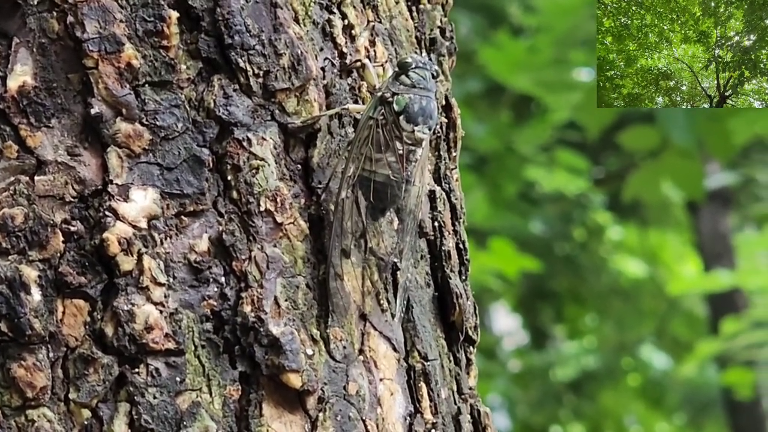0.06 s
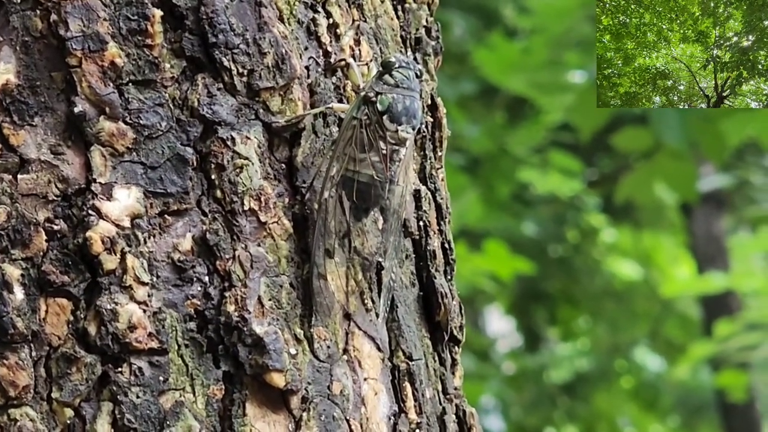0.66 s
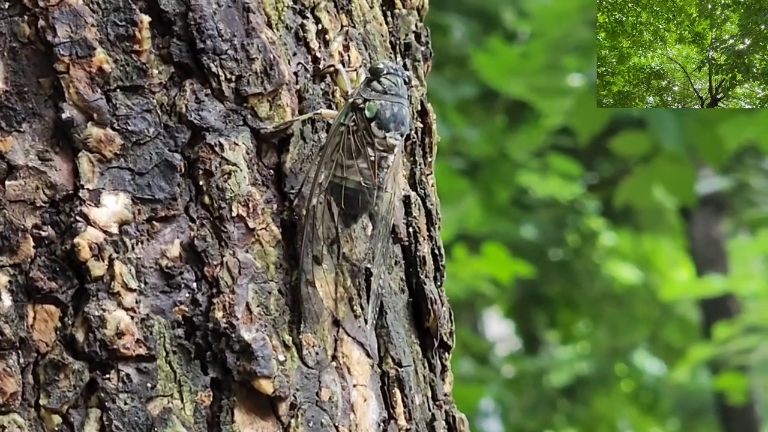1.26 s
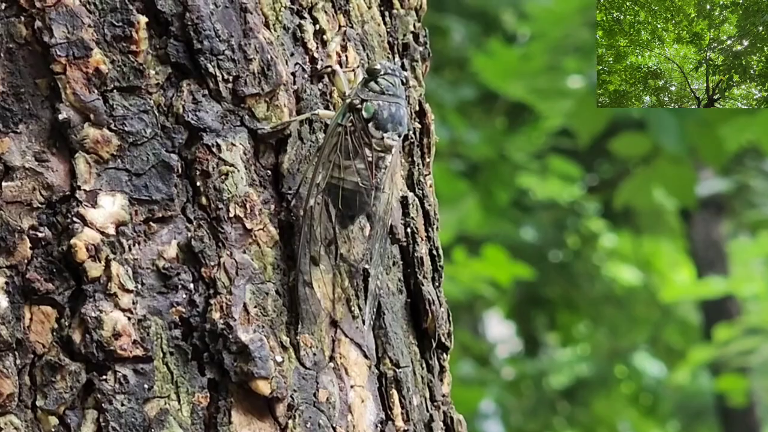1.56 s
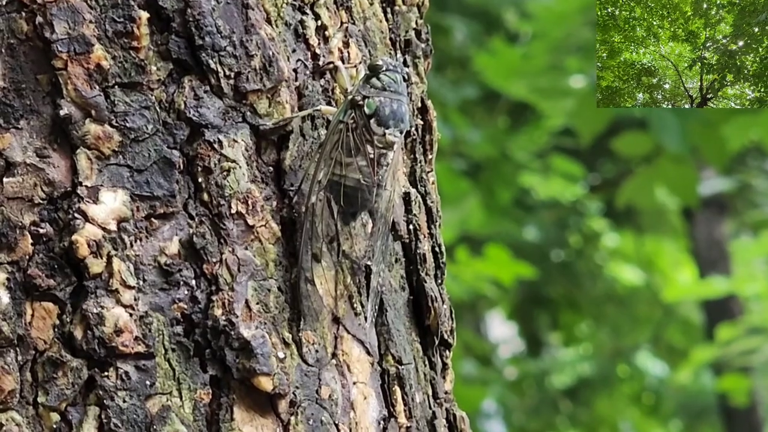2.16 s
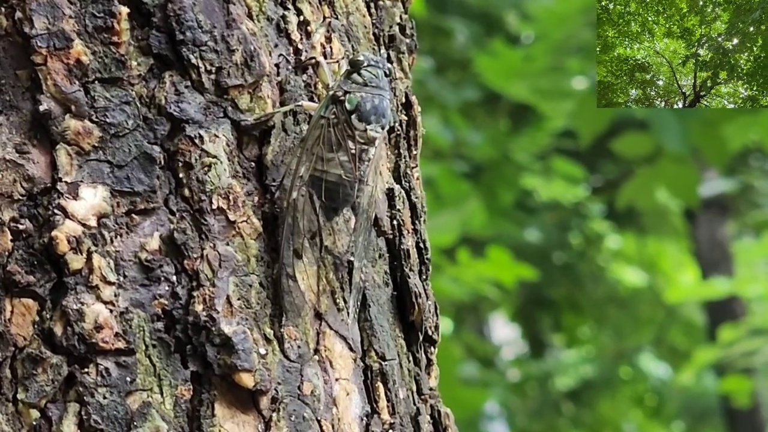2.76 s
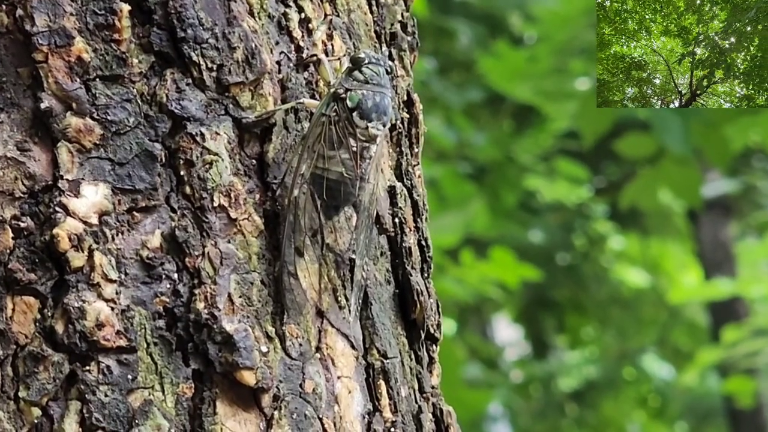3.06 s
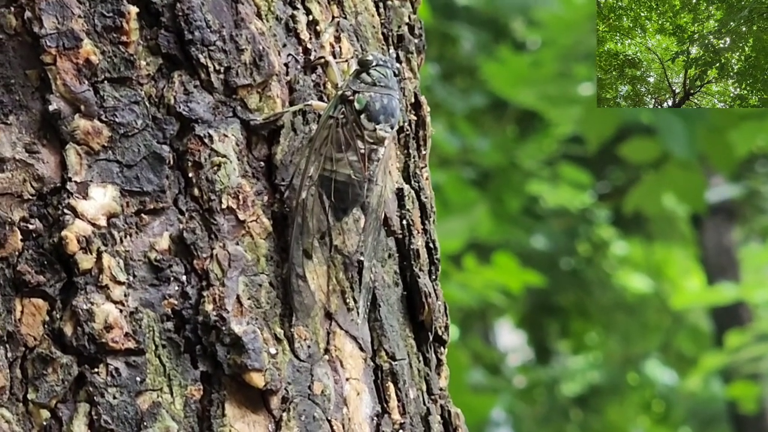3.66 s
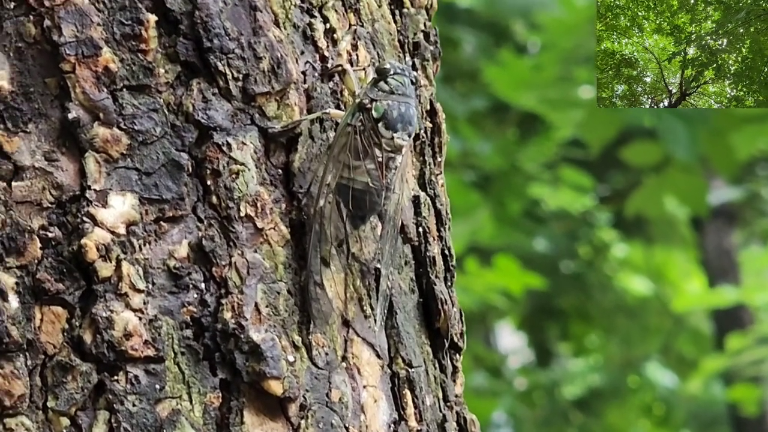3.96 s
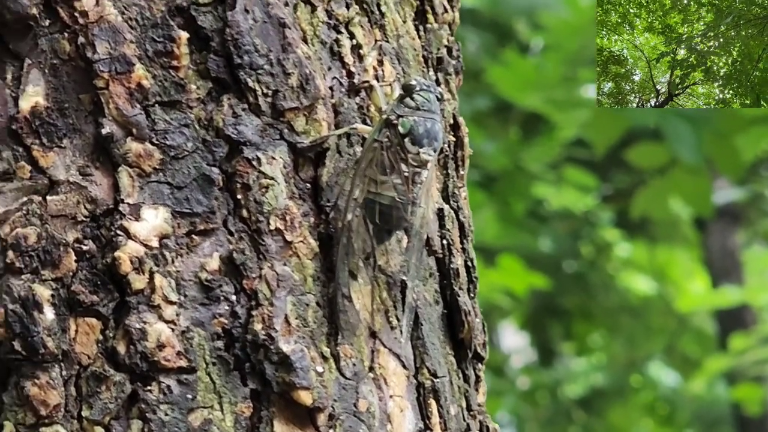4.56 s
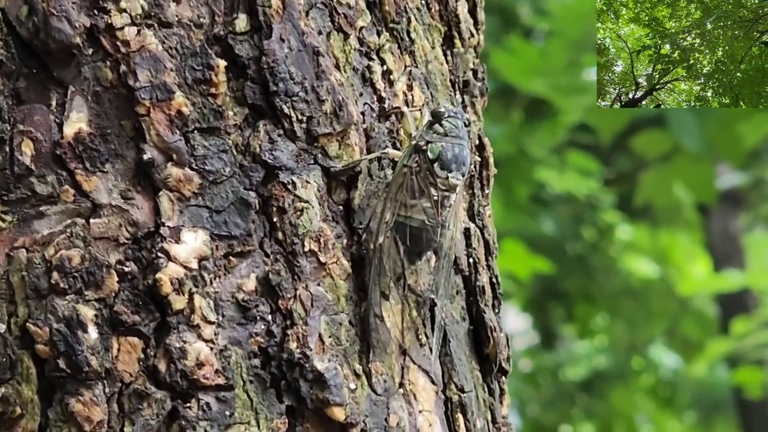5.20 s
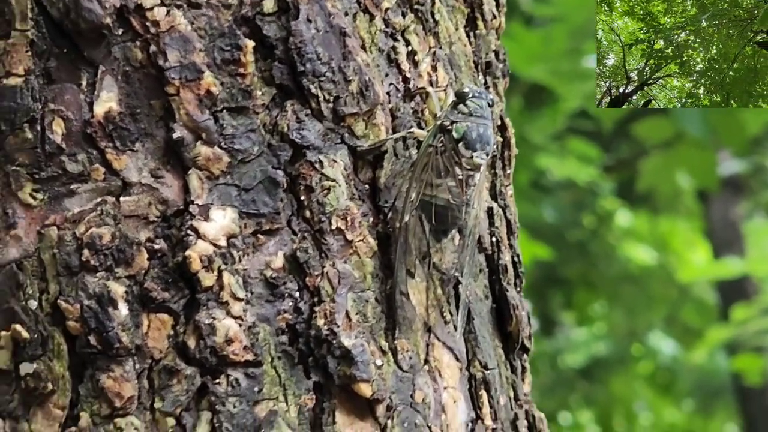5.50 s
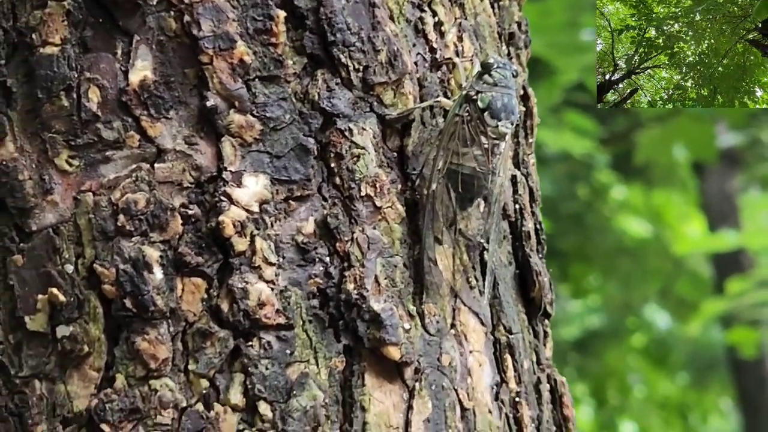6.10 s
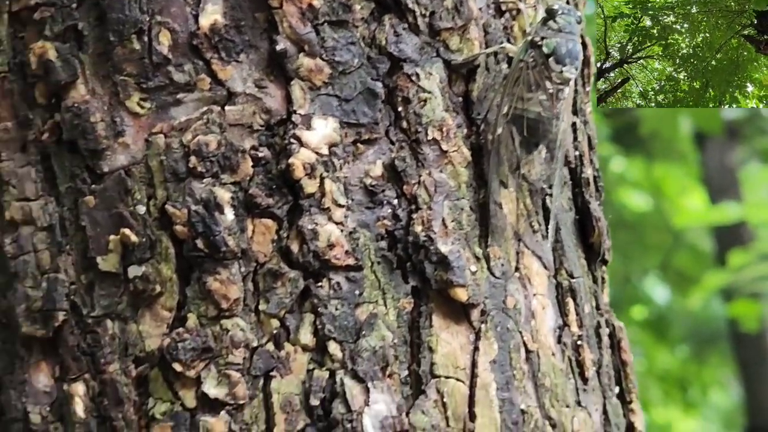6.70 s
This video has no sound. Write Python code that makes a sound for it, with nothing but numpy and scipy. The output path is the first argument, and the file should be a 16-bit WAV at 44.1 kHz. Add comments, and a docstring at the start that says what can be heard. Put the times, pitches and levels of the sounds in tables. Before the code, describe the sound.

A high-pitched cicada chorus fills a forest while a few close insects buzz in bursts over a faint, distant rumble.

```python
"""Cicadas in a summer wood.

A stereo microphone stands under the trees; a few near males stand out from a far drone and hiss.
Each buckles his two tymbals in turn, and the abdomen colours the clicks: now a full buzz, now a
thin shrill. A faint low rumble and hum, as of a distant town, lies beneath."""
import sys
import numpy as np
from scipy import signal
from scipy.fft import rfft, irfft, next_fast_len
from scipy.io import wavfile

SR = 44100
rng = np.random.default_rng(int(sys.argv[2]) if len(sys.argv) > 2 else 0)


def bounce(signal):
    """Save signal as a 16-bit WAV file at the path given by the first command-line argument."""
    frames = np.transpose(np.atleast_2d(signal))
    limited = np.clip(frames, -1, 1)
    pcm = np.round(limited * 32767).astype(np.int16)
    wavfile.write(sys.argv[1], SR, pcm)


N = 301644

# body resonances of a full buzz and a thin shrill: f/Hz, width/Hz, relative level/dB, left-right/dB
FULL_BUZZ = [(4150, 770, 3.5, 14), (4850, 600, 5, -1), (5020, 960, 1.5, 18), (6500, 150, 0, 23),
             (7154, 850, 0, 6)]
THIN_SHRILL = [(12180, 1620, -12.5, 2), (14150, 2000, -4.5, 7.5), (15270, 870, 3, 14)]
BUZZ_ATTACK_S, BUZZ_RELEASE_S = 0.06, 0.09
SHRILL_ATTACK_S, SHRILL_RELEASE_S = 0.25, 0.32


def from_db(db):
    """Decibels to gain."""
    return 10 ** (np.asarray(db) / 20)


def rms_one(x):
    """Scale to unit rms."""
    return x / np.sqrt(np.mean(x ** 2) + 1e-20)


def pan(db):
    """Left and right gains for a level difference, power kept."""
    gains = from_db(np.array([[1], [-1]]) * db / 2)
    return gains / np.sqrt(np.mean(gains ** 2, axis=0))


def in_time(points):
    """Read a curve over time, sample by sample."""
    times, values = np.transpose(points)
    return np.interp(np.arange(N) / SR, times, values)


def at_hz(points, hz):
    """Read a spectrum on a log-frequency axis."""
    f, value = np.transpose(points)
    return np.interp(np.log(hz + 1e-6), np.log(f), value)


def drift(rate_hz):
    """Random wander of unit rms, mostly slower than rate_hz."""
    step, settle = 40, 2000
    r = np.exp(-2 * np.pi * rate_hz * step / SR)
    noise = rng.standard_normal(N // step + settle + 2)
    slow = signal.lfilter([1], [1, -2 * r, r * r], noise)[settle:]
    return np.interp(np.arange(N) / step, np.arange(len(slow)), rms_one(slow))


def resonate(x, hz, width):
    """One resonance with gain 1 at its peak."""
    r = np.exp(-np.pi * width / SR)
    feedback = [1, -2 * r * np.cos(2 * np.pi * hz / SR), r * r]
    return signal.lfilter(np.array([1, 0, -1]) * (1 - r * r) / 2, feedback, x)


def diffuse(spectrum, flicker_db, flicker_hz):
    """Wavering noise that reaches the microphone from all round, alike on both sides only in the bass."""
    # likeness of the two sides: f/Hz, correlation
    likeness = [(30, 0.89), (100, 1), (180, 0.92), (350, 0.74), (700, 0.41), (1300, -0.33), (2500, -0.022),
                (16000, -0.13)]
    # the left side hears more bass and more of the treetops: f/Hz, left-right/dB
    lean = [(60, 0.5), (300, 3), (1300, 1.5), (3000, 1.5), (4600, -0.5), (6500, 0), (9500, -1.5),
            (12000, -2), (14500, 4.5)]
    size = next_fast_len(N)
    hz = np.fft.rfftfreq(size, 1 / SR)
    mid, side = rfft(rng.standard_normal((2, size)))
    alike = np.clip(at_hz(likeness, hz), -1, 1)
    stereo = np.sqrt(1 + alike) * mid + np.sqrt(1 - alike) * side * [[1], [-1]]
    in_band = (hz > spectrum[0][0]) & (hz < spectrum[-1][0])
    gain = from_db(at_hz(spectrum, hz)) * in_band * pan(at_hz(lean, hz))
    noise = irfft(gain * stereo, size)[:, :N]
    return rms_one(noise * from_db(flicker_db * drift(flicker_hz)))


def town():
    """Far beyond the wood traffic rumbles and machinery hums, each tone part steady, part wavering."""
    # traffic spectrum: f/Hz, relative level/dB
    rumble_spectrum = [(13, -40), (22, -22), (38, -3), (59, -5), (76, -4), (107, -7.5), (141, -9.5),
                       (383, -20.5), (459, -19.5), (1290, -25.5), (1700, -28), (2210, -61), (3740, -120)]
    # course of the rumble, which the hum follows: t/s, level/dB
    rumble_level = [(0, -37.5), (2.4, -36.5), (4.5, -38), (6.84, -37.5)]
    # machinery tones: f/Hz, width/Hz, level against the rumble/dB, steady share of the power
    tones = [(53, 3, -1.5, 0.35), (62.1, 3.3, -8.5, 0.36), (100.1, 2.8, -8, 0.88), (120.9, 1.6, -14, 0.08),
             (239, 4, -26, 0.34)]
    t, hum = np.arange(N) / SR, 0
    for hz, width, db, share in tones:
        phase = 2 * np.pi * hz * t
        steady = np.sqrt(2 * share) * np.cos(phase)
        wavering = drift(width) * np.cos(phase) + drift(width) * np.sin(phase)
        hum += from_db(db) * (steady + np.sqrt(1 - share) * wavering)
    rumble = diffuse(rumble_spectrum, flicker_db=0.5, flicker_hz=6.4)
    return from_db(in_time(rumble_level)) * (hum * pan(1.8) + rumble)


def far_chorus():
    """Hundreds of far males merge into a slowly sinking drone, with a shrill hiss from the crowns."""
    # three bands of the chorus: f/Hz, relative level/dB
    low_band = [(1500, -36.5), (2000, -17), (2500, -14.5), (2950, -4.5), (3600, -1.5), (3850, 0.5),
                (4100, -28)]
    upper_band = [(3500, -33), (3800, -5.5), (4100, 0.5), (4650, 2), (5200, -1.5), (5900, -3), (6600, -2.5),
                  (7400, -9), (8100, -16), (9000, -13.5), (10000, -17.5), (11500, -16)]
    hiss_band = [(9000, -32), (10200, -25), (11200, -8.5), (12400, 0), (13400, 1.5), (14600, 3.5),
                 (15700, 1.5), (17000, -22)]
    # the hiss ebbs and returns: t/s, level/dB
    hiss_level = [(0, -23), (2.0, -23.3), (3.8, -23), (4.8, -25), (6.25, -26), (6.84, -22)]
    sinking = from_db(-0.243 * np.arange(N) / SR)  # dB per second
    low = from_db(-28.5) * diffuse(low_band, flicker_db=1.35, flicker_hz=10.8)
    upper = from_db(-23.5) * diffuse(upper_band, flicker_db=0.77, flicker_hz=7)
    hiss = from_db(in_time(hiss_level)) * diffuse(hiss_band, flicker_db=0.5, flicker_hz=11)
    return sinking * (low + upper) + hiss


def tymbals(beat_hz, wander, skew, weak_db=-2.0, jitter_s=2e-6, uneven_db=1.84):
    """Two tymbals click in turn, one a little weaker and late by a share skew of the click spacing."""
    beat_hz = beat_hz * (1 + wander * drift(12.23))
    turn = 2 * np.cumsum(beat_hz) / SR + 2 * rng.random()
    nearest = np.round(turn).astype(int)
    weak = nearest % 2
    timing, strength = rng.standard_normal((2, N // 20))
    samples_away = ((turn - nearest - skew * weak) / (2 * beat_hz) + jitter_s * timing[nearest]) * SR
    clicks = np.sinc(samples_away) * np.exp(-(samples_away / 8) ** 2)
    return clicks * from_db(weak_db * weak + uneven_db * strength[nearest])


def body(clicks, modes):
    """Clicks ring the body; each resonance has steep flanks and radiates in its own direction."""
    sound = 0
    for k, (hz, width, db, side_db) in enumerate(modes):
        ring = resonate(resonate(clicks, hz, width), hz, width)
        sound += ring * (-1) ** k * from_db(db) * pan(side_db)
    return rms_one(sound)


def wood(x, wet_db, t60_s=0.3):
    """Trunks and leaves scatter a dying cloud of echoes, different on each side of the microphone."""
    t = np.arange(SR // 2) / SR
    response = rng.standard_normal((2, len(t))) * from_db(-60 * t / t60_s)
    response /= np.sqrt(np.sum(response ** 2, axis=1, keepdims=True))
    echoes = signal.fftconvolve(x, response, axes=1)[:, :N]
    wet = from_db(wet_db)
    return (x + wet * echoes) / np.sqrt(1 + wet ** 2)


def crowd(count=4):
    """Males at middle distance, each at a pace of his own, swelling and sinking."""
    # body resonances: f/Hz, width/Hz, relative level/dB, left-right/dB
    modes = [(3853, 1790, 4, -5), (4900, 750, -4.5, 2), (6840, 1850, -2.5, 2), (13870, 3100, 1.5, 4)]
    clicks = 0
    for pace_hz in np.linspace(155, 188, count) + rng.normal(0, 2, count):
        beat_hz = pace_hz * (1 + 0.01 * drift(0.97))
        clicks += tymbals(beat_hz, wander=0.003, skew=0.019) * from_db(2.66 * drift(6.3))
    return rms_one(wood(body(clicks, modes), wet_db=7.5))


def envelope(calls, attack_s, release_s):
    """Gain of a row of calls: each is fully open at its time, holds for its length and dies away."""
    t, gain = np.arange(N) / SR, 0
    for start, length, db in calls:
        corners = [start - attack_s, start, start + length, start + length + release_s]
        gain += from_db(db) * np.interp(t, corners, [0, 1, 1, 0])
    return gain


def beat_rate(hz, held_s, hz_per_s):
    """Beat rate of one tymbal: a male holds his pace, then tires or warms up evenly."""
    return hz + hz_per_s * np.maximum(np.arange(N) / SR - held_s, 0)


def male(voices, beat_hz, wet_db, wander, skew):
    """One male's clicks feed each voice (gain, resonances) as his abdomen stretches and relaxes."""
    clicks = tymbals(beat_hz, wander, skew)
    return wood(sum(gain * body(clicks, modes) for gain, modes in voices), wet_db)


def distant_male():
    """Farther off, heard mostly through his echoes, a male buzzes softly and swells about twice a second."""
    # body resonances: f/Hz, width/Hz, relative level/dB, left-right/dB
    modes = [(4130, 1120, 2.5, 0.22), (5040, 1500, -4, -1), (6730, 3200, -11, 1)]
    # the soft buzz and the swells on top: t/s, length/s, level/dB
    spell = [(2.7, 4.1, -42.5)]
    swells = [(2.78, 0.09, -28), (3.39, 0.06, -29), (3.75, 0.05, -32), (4.21, 0.1, -28), (4.76, 0.09, -28),
              (5.21, 0.07, -28), (5.66, 0.16, -29.5), (6.1, 0.05, -29), (6.3, 0.13, -26.5),
              (6.55, 0.04, -29)]
    buzz = envelope(spell + swells, attack_s=0.14, release_s=0.11)
    beat_hz = beat_rate(177.9, held_s=2.75, hz_per_s=-4.5)
    return male([(buzz, modes)], beat_hz, wet_db=10.0, wander=0.025, skew=0.02)


def late_male():
    """Some way from the microphone, a male warms up late with two short buzzes."""
    # buzzes: t/s, length/s, level/dB
    calls = [(6.06, 0.06, -26.5), (6.52, 0.06, -22.5)]
    buzz = envelope(calls, BUZZ_ATTACK_S, BUZZ_RELEASE_S)
    beat_hz = beat_rate(160, held_s=6.0, hz_per_s=14)
    return male([(buzz, FULL_BUZZ)], beat_hz, wet_db=3.0, wander=0.006, skew=0.018)


def fading_male():
    """Fairly near, one long buzz gives way to a thin shrill that runs down."""
    # body resonances of his buzz: f/Hz, width/Hz, relative level/dB, left-right/dB
    modes = [(4020, 620, -2.5, -3), (4640, 630, -0.5, -5), (5220, 340, 6.5, -22), (5600, 590, -2.5, 23),
             (6430, 570, -6.5, -2), (7430, 540, -7.5, 13), (8500, 310, -13, 3)]
    # the buzz and the spell of shrilling: t/s, length/s, level/dB
    calls = [(0.81, 0.14, -17.5)]
    spell = [(1.12, 2.35, -26.5)]
    buzz = envelope(calls, attack_s=0.14, release_s=0.11)
    shrill = envelope(spell, SHRILL_ATTACK_S, SHRILL_RELEASE_S)
    beat_hz = beat_rate(187.7, held_s=2.12, hz_per_s=-16.0)
    return male([(buzz, modes), (shrill, THIN_SHRILL)], beat_hz, wet_db=1.0, wander=0.002, skew=0.02)


def pumping_male(dip_db=-10, hurry_hz=3.0):
    """The nearest male: each pump of the abdomen opens the buzz, damps the shrill, hurries the tymbals."""
    # the buzzes, and the spell of shrilling before its dips: t/s, length/s, level/dB
    calls = [(0.38, 0.08, -27), (1.31, 0.07, -23.5), (1.775, 0.065, -22), (2.22, 0.08, -21.8),
             (2.64, 0.16, -27.5)]
    spell = [(1.24, 1.32, -19.8)]
    buzz = envelope(calls, BUZZ_ATTACK_S, BUZZ_RELEASE_S)
    effort = buzz / buzz.max()
    shrill = envelope(spell, SHRILL_ATTACK_S, SHRILL_RELEASE_S) * from_db(dip_db * effort)
    shrill = shrill * pan(-4.5)  # draws the left-leaning shrill towards the middle
    beat_hz = beat_rate(198.6, held_s=2.0, hz_per_s=-5.0) + hurry_hz * effort ** 2
    voices = [(buzz, FULL_BUZZ), (shrill, THIN_SHRILL)]
    return male(voices, beat_hz, wet_db=-5.0, wander=0.0012, skew=0.032)


def scene():
    """From under the trees: single males in front of the crowd, the far chorus and the town."""
    males = pumping_male() + fading_male() + distant_male() + late_male()
    return males + from_db(-26) * crowd() + far_chorus() + town()


def record(dry, cutoff_hz=15750):
    """The microphone signal is cut steeply at the top."""
    return signal.sosfilt(signal.ellip(14, 0.1, 90, cutoff_hz, fs=SR, output="sos"), dry)


dry = scene()
out = record(dry)
bounce(out)
```